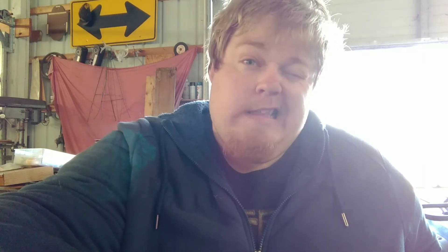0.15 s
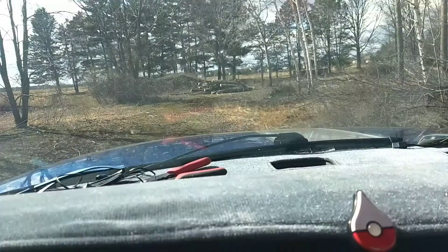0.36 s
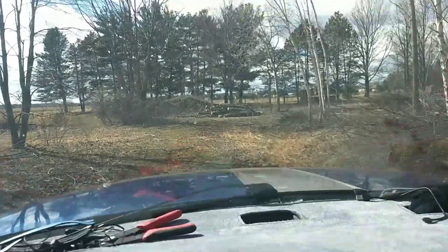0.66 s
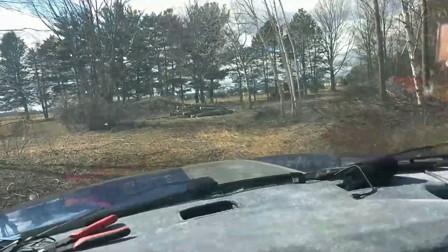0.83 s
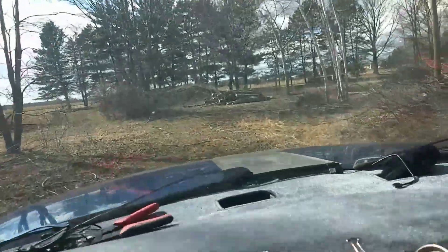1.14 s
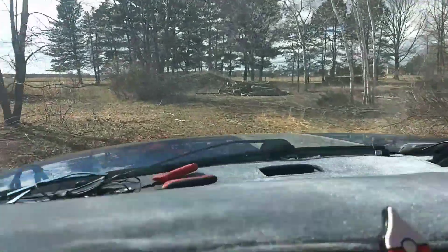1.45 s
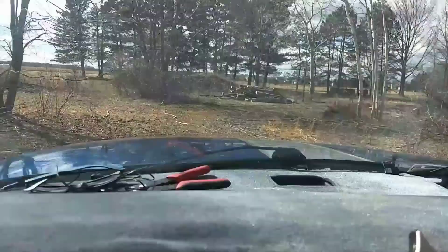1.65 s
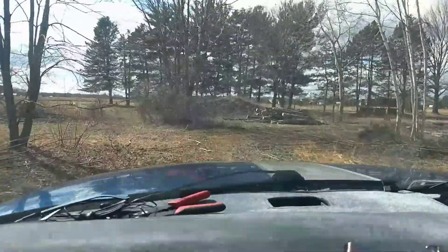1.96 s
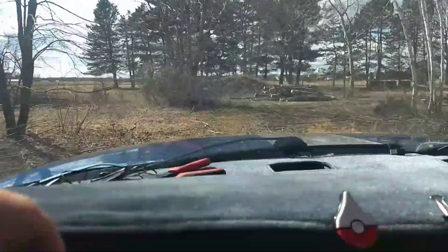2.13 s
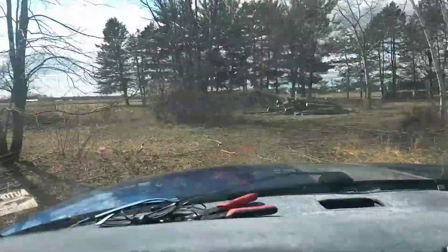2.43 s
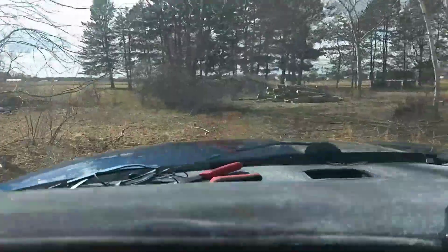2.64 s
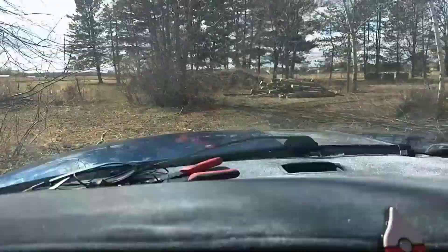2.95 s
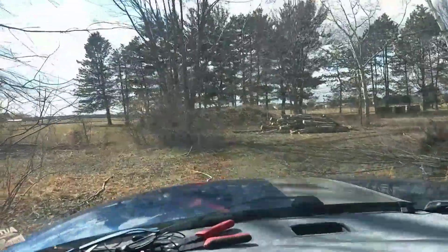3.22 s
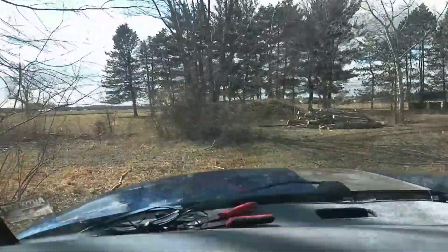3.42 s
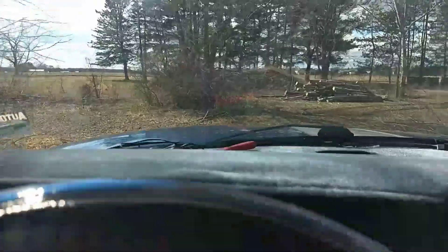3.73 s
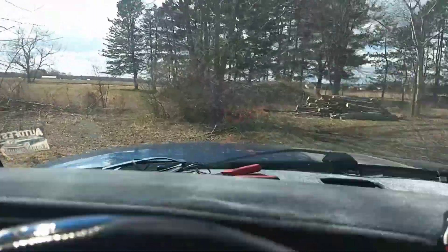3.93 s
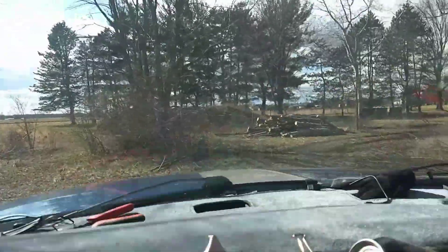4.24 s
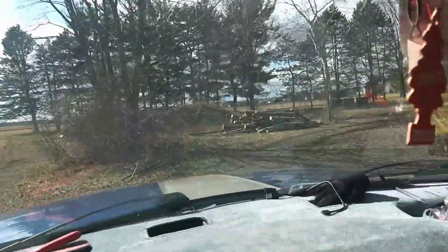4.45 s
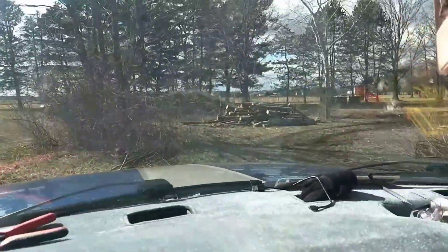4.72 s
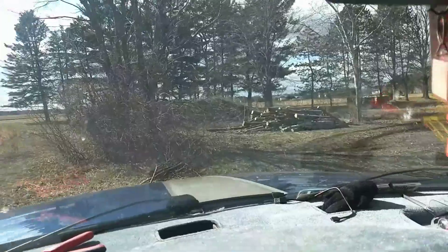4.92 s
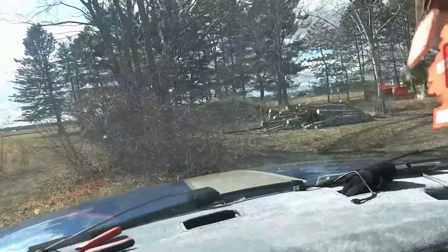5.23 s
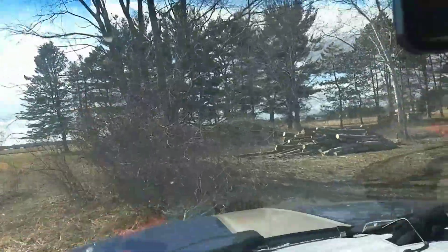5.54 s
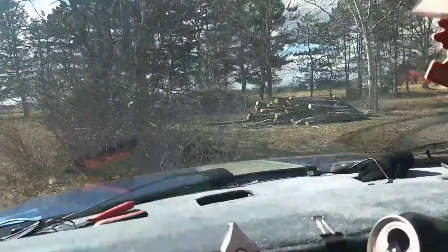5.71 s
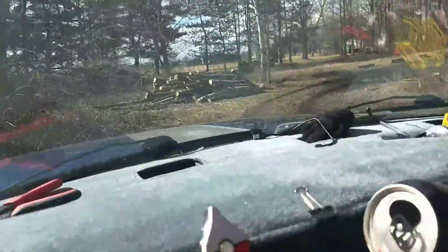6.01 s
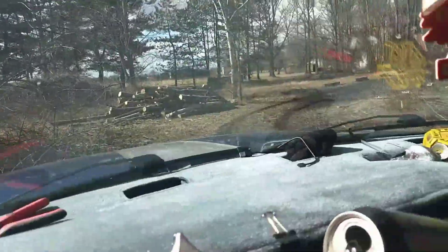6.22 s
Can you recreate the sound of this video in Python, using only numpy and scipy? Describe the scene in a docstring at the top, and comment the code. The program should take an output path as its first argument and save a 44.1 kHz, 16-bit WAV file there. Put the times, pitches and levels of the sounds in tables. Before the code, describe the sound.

After a tap and a click, a pickup engine booms and clatters at low revs, heard from the cab with thuds and dashboard rattles.

```python
"""Pickup on a rough trail

A tap rings out in a quiet workshop and two dry clicks sound close by. Then the scene jumps into the
cab of a crawling pickup. Its six-cylinder engine booms and clatters at low, steady revs, and a
belt-driven pump whines. Bumps thud through the body, loose things knock and rattle on the dashboard,
twigs scrape by and dry litter crackles under the tyres."""
import sys
import numpy as np
from scipy import signal
from scipy.fft import rfft, irfft
from scipy.io import wavfile

SR = 44100
rng = np.random.default_rng(int(sys.argv[2]) if len(sys.argv) > 2 else 0)


def transcribe(u):
    """Save the signal u as a 16-bit wav file named by the first command-line argument.

    u: samples, shape (n,) or (channels, n), limited to [-1, 1]; the rate is SR.
    q: integer samples, one column per channel.
    """
    v = np.clip(np.atleast_2d(u).T, -1, 1)
    q = np.round(v * 32767).astype(np.int16)
    wavfile.write(sys.argv[1], SR, q)


N = 280917
T = np.arange(N) / SR
FREQS = np.maximum(np.arange(N // 2 + 1) * SR / N, 1)
SHOP_END_S, CAB_START_S = .287, .316

# Levels in the tables are relative: they compare one row with another.
# how often the engine fires: time_s, firing_hz
REVS = [(0.3, 51.2), (0.8, 51.1), (1.3, 51.5), (1.75, 51.0), (2.5, 51.8), (3.0, 51.0), (3.55, 51.55),
        (4.0, 51.3), (4.45, 51.55), (4.8, 50.4), (5.05, 50.0), (5.45, 50.1), (5.75, 51.1), (6.02, 50.4),
        (6.37, 51.2)]
# how hard the truck pulls: time_s, effort_db
EFFORT = [(0.7, -0.5), (1.55, -0.5), (2.05, 0), (2.5, -1.5), (2.7, -3.5), (3.05, -2), (3.35, 0.5),
          (3.6, 0.5), (4.05, -0.6), (4.4, 0.85), (4.95, -1.5), (5.3, 0), (5.55, 0.5), (5.9, -0.5),
          (6.37, 0)]
# the exhaust's tones: multiple_of_firing_rate, level_db, left_minus_right_db
BOOM_TONES = [(1, -7, 0), (2, -0.5, 4.5), (3, -10, -4), (4, -14, -3), (5, -18, -2), (6, -20, -1),
              (8, -20, 0), (12, -21, 0)]
# how hard each cylinder clatters, in firing order (one has a loose tappet, a valve part): level_db
CYLINDERS_DB = [-4, -6, 0, -4, -4, -12]
# ringing panels around the engine: pitch_hz, width_hz, boost_db
PANELS = [(419, 33, 5.5), (625, 27, 6), (780, 41, -1), (891, 7, 17), (994, 57, 10), (1218, 22, -7),
          (1440, 18, 3)]
# the pump's tones: multiple_of_pitch, level_db, share_of_swell
PUMP_TONES = [(.777, -13, 0.74), (.951, -6, 0.19), (1, 0, 1), (1.262, -12.5, 0.13)]
# how the whine swells with the load on the pump: time_s, swell_db
PUMP_LOAD = [(0.6, -6.5), (1.45, 3), (1.8, -3), (2.1, 1), (2.35, -5), (2.85, 6), (3.15, -5.5), (3.6, 3),
             (4.3, 1.5), (5.0, -15), (5.45, -3), (5.65, -5), (5.95, 3.5), (6.37, -3.5)]
# jolts coming through the suspension: time_s, level_db
BUMPS = [(0.596, -19), (0.814, -14.5), (1.192, -14.5), (1.367, -14), (1.613, -16.5), (2.002, -21),
         (2.183, -12.5), (2.288, -23), (3.674, -18.5), (3.736, -22), (4.197, -19.5), (4.695, -17),
         (4.739, -16.5), (4.793, -17), (5.167, -18), (5.396, -18), (5.742, -16.5), (6.073, -15.5)]
# the notes of the truck's body: pitch_hz, level_db, fade_s (time to fall by 60 dB)
BODY_NOTES = [(137, -13.5, 0.084), (165, 1.5, 0.065), (179, -3, 0.075), (233, -17.5, 0.1)]
# loose things hitting the dashboard: start_s, clack_db, click_db, treble_db, pitch_hz
KNOCKS = [(0.4566, -26.5, -30, -27, 3130), (0.967, -27, -41.5, -39.5, 2950),
          (1.189, -28, -43.5, -39.5, 2930), (1.583, -33.5, -45, -56, 2600), (1.831, -33.5, -55, -47, 2680),
          (2.066, -35, -48, -63, 2600), (2.321, -32.5, -42, -34, 3060), (2.5494, -25, -28, -35.5, 2560),
          (2.912, -28.5, -30.5, -32.5, 3690), (3.3091, -25, -34.5, -35, 3420), (3.916, -31, -51, -49, 2800),
          (3.951, -31, -43, -44, 2780), (4.147, -33, -49, -62, 2730), (4.339, -29, -40.5, -51, 2930),
          (4.555, -27, -41, -54, 2780), (4.8267, -29.5, -40.5, -63, 3730), (5.345, -40, -51, -46, 2760),
          (5.663, -36, -63, -73, 2680), (5.677, -29.5, -60, -60, 2820), (5.848, -35.5, -45, -43, 2950)]
# a typical lighter tick between those knocks: clack_db, click_db, treble_db, pitch_hz
TICK = (-42.5, -61, -55, 2750)
# the notes of plastic and small metal things: pitch_hz, level_db, fade_s
KNOCK_NOTES = [(3723, -8, 0.07), (4940, 6, 0.025), (5280, 4, 0.02), (11000, -4, .07), (11480, -1, 0.07)]
# twigs brushing the body: middle_s, length_s, level_db
TWIGS = [(0.552, 0.22, -39), (0.94, 0.28, -42), (1.572, 0.14, -48), (4.397, 1, -52), (5.43, 0.18, -44)]
# dry litter under the tyres: time_s, level_db
LITTER = [(0.7, -59), (0.9, -53), (1.1, -59.5), (1.35, -62), (1.55, -54), (1.75, -64), (1.9, -51),
          (2.1, -70), (2.4, -58.5), (2.7, -63), (3.2, -64), (3.6, -55), (4.0, -63), (4.5, -57), (4.9, -58),
          (5.7, -55.5), (6.1, -66), (6.37, -58)]
# dry clicks in the workshop: start_s, level_db
CLICKS = [(0.2164, -21), (0.227, -0.5)]

# Each sound's colour, or how strong it is from low to high: pitch_hz, level_db
CLATTER_COLOUR = [(250, -12.5), (500, 0), (700, 3), (880, -2), (1100, 1.5), (1400, 0), (1750, -0.3),
                  (2200, -5), (2900, -8), (3500, -21), (5000, -18.5), (6500, -44), (16000, -62)]  # burning fuel and valves
TAPPET_COLOUR = [(1500, -65), (2300, 5), (2850, 0.5), (3150, -9.5), (3600, -13.5), (5000, -34), (6500, -53)]  # ringing valve gear
KNOCK_COLOURS = [
    [(150, -24), (600, 9.5), (1500, 2.5), (2100, -0.5), (3200, 3.5), (4000, 0.5), (5500, -35)],
    [(3300, -17.5), (4500, 2), (5200, 6), (6100, 0), (8000, -15.5)],
    [(5500, -20.5), (7600, -1), (9000, -4.5), (12000, 3), (15500, 2.5)],
]  # one list each for a knock's clack, click and treble
RUMBLE_COLOUR = [(25, -40), (45, -27), (80, -5), (125, -1.5), (185, 2), (250, -4), (350, -7), (440, -8),
                 (520, -17), (900, -49)]  # rolling over the ground
RATTLE_COLOUR = [(800, -16), (2000, -1), (2850, -1), (3600, -13.5), (4300, -13), (5100, -18), (6200, -36),
                 (8200, -64), (15000, -26)]  # shaking trim
TWIG_COLOUR = [(1800, -25), (2900, 4), (3700, 3), (4400, 5), (5300, -4), (6500, -16), (8000, -14.5),
               (14000, -25)]  # wood sliding on the body
LITTER_COLOUR = [(4000, 1), (6500, 3), (8500, -14), (10500, -3.5), (12500, 4.5), (15500, 5.5)]  # litter being crushed
TAP_COLOUR = [(150, -34), (600, -8), (1500, 1), (3100, 4.5), (4500, -14), (5900, -3), (8000, -22),
              (10000, -33), (13000, -15), (15500, -7.5)]  # the workshop's echo
CLICK_COLOUR = [(60, -37), (130, 4), (170, 7), (230, 0), (400, -4.5), (950, 7), (1900, -2), (3500, -12),
                (5300, -3.5), (8000, -11.5), (12000, -20), (15500, -40.5)]  # a clicking thin shell
AIR_COLOUR = [(30, -17), (150, -7), (700, -17), (1500, -11.5), (2300, -31), (5500, -33), (9000, -46),
              (15500, -37)]  # the workshop's background

# how alike noise is at the microphone's two openings: pitch_hz, likeness (0 to 1)
LIKENESS = [(60, 0.96), (150, 0.5), (430, 0.38), (650, 0.7), (1050, 1), (1350, 0.73), (1600, .65),
            (2200, 1), (3800, 0.75), (5500, 1), (15000, 0.96)]
# how far the left opening lags behind the right: pitch_hz, lag_radians
LEFT_LAG = [(0, 0), (50, .05), (100, 1.1), (154, 1.5), (330, 1.0), (620, .15), (1080, 0), (1300, .45),
            (1550, 1.6), (1850, 2.7), (2200, 3.4), (16500, 14 * np.pi)]


def boom(firing_count, level_db, waver_db=1.2, uneven_radians=.032):
    """The exhaust fills the cab with low tones; the firings are slightly uneven."""
    out = 0
    for multiple, tone_db, pan_db in BOOM_TONES:
        tone = np.sqrt(2) * np.sin(multiple * (2 * np.pi * firing_count + uneven_radians * wander(32)))
        sides_db = np.array([[pan_db], [-pan_db]]) / 2
        out = out + tone * gain(level_db + tone_db + waver_db * wander(4.3) + sides_db)
    return out


def clatter(firing_count, level_db, repeat=.59):
    """Noise from burning fuel and valves swells at each firing and makes the panels ring."""
    panels = 1 + sum(gain(db) / (1 + ((FREQS - hz) / (width / 2)) ** 2) for hz, width, db in PANELS)
    loudness = (1 + .8 * pulses(firing_count, onset=.78, decay=.4)) * surge(30, spread_db=.6)
    # each turn of the camshaft, which works the valves, brings the same run of small hits
    cylinders = len(CYLINDERS_DB)
    samples = int(cylinders * N / firing_count[-1])
    positions = np.arange(samples) * cylinders / samples
    hits = np.array([np.interp(firing_count, positions, pattern, period=cylinders)
                     for pattern in rng.standard_normal((3, samples))])
    return noise(colour(CLATTER_COLOUR) * np.sqrt(panels), loudness, repeat * hits) * gain(level_db)


def tappets(firing_count, level_db):
    """The valve gear ticks brightly, in a limping pattern that repeats every six firings."""
    return noise(colour(TAPPET_COLOUR), pulses(firing_count, onset=.8, decay=.8)) * gain(level_db)


def pulses(firing_count, onset, decay):
    """Each cylinder gives a burst of its own size; onset and decay are shares of one firing."""
    count, progress = np.divmod(firing_count - onset, 1)
    return gain(CYLINDERS_DB)[count.astype(int) % len(CYLINDERS_DB)] * np.exp(-progress / decay)


def pump(firing_hz, pitch_ratio=15.5, level_db=-37, waver_db=3):
    """The pump's whine follows the revs, drifts as the belt slips and swells under load."""
    out, swell_db = 0, over_time(PUMP_LOAD)
    for multiple, tone_db, share in PUMP_TONES:
        pitch_hz = firing_hz * pitch_ratio * multiple * (1 + .01 * wander(30))
        tone = np.sqrt(2) * np.sin(2 * np.pi * np.cumsum(pitch_hz) / SR)
        out = out + tone * gain(level_db + tone_db + share * swell_db + waver_db * wander(20))
    return out


def bumps(rise_s=.0073, boost_db=2):
    """Each jolt pushes softly on the body, which answers with a short, low thud."""
    out, t = np.zeros(N), T[:SR // 5]
    for time_s, db in BUMPS:
        thud = ring(BODY_NOTES, t, detune=.055) * (1 - np.exp(-(t / rise_s) ** 2))
        add(out, time_s - rise_s / 2, gain(db + boost_db) * thud / np.abs(thud).max())
    return out


def knocks(echo_s=.013, ring_db=-9, boost_db=2.5):
    """A loose thing hits hard, then chatters to rest while the cab throws the sound back."""
    out, t = np.zeros((2, N)), T[:SR // 6]
    filters = [impulse(points) for points in KNOCK_COLOURS]
    for start_s, *levels_db, pitch_hz in KNOCKS + random_ticks():
        direct = rng.standard_normal(len(t)) * (np.exp(-t / .002) + .7 * np.exp(-t / .007))
        contact = direct + .39 * rng.standard_normal((2, len(t))) * np.exp(-t / echo_s)
        notes = ring([(pitch_hz, 9, .028)] + KNOCK_NOTES, t, detune=.01)
        ringing = signal.fftconvolve(contact, [notes / np.linalg.norm(notes)])[:, :len(t)]
        knock = contact + gain(ring_db) * ringing
        for shape, db in zip(filters, levels_db):
            part = signal.fftconvolve(knock, [shape])
            add(out, start_s, gain(db + boost_db) * part / np.std(part[:, :SR // 80]))
    return out


def random_ticks(per_s=2.5, spread_db=1.5):
    """Extra rows like those in KNOCKS: light hits of random time, strength and pitch."""
    *levels_db, pitch_hz = TICK
    chance = rng.random((64, 3))
    times = CAB_START_S + np.cumsum(.2 + 1.6 * chance[:, 0]) / per_s
    return [(start_s, *(np.array(levels_db) + spread_db * size), pitch_hz * (1 + .1 * tuning))
            for start_s, (size, tuning) in zip(times, 2 * chance[:, 1:] - 1) if start_s < T[-1]]


def rumble(level_db):
    """Uneven ground makes a low rumble that rises and falls."""
    return noise(colour(RUMBLE_COLOUR), surge(10, spread_db=1.6)) * gain(level_db)


def rattle(level_db):
    """Uneven ground shakes the cab's trim in flurries of tiny hits."""
    shaking = tiny_hits(per_s=300, spread_db=1, decay_s=.0086) * surge(8, spread_db=5.7)
    return noise(colour(RATTLE_COLOUR), shaking) * gain(level_db)


def twigs():
    """Each twig catches and slips in quick little jerks, swelling and fading as it passes."""
    passing = sum(gain(db) * np.exp(-(2 * (T - middle_s) / length_s) ** 2)
                  for middle_s, length_s, db in TWIGS)
    return noise(colour(TWIG_COLOUR), tiny_hits(per_s=1400, spread_db=3.5, decay_s=.0042)) * passing


def litter(boost_db=8):
    """Dry litter crackles as the tyres roll over it."""
    snaps = tiny_hits(per_s=1700, spread_db=3, decay_s=.0035)
    return noise(colour(LITTER_COLOUR), snaps) * gain(over_time(LITTER) + boost_db)


def workshop_tap(time_s=.0028, level_db=-21):
    """A sharp tap echoes between the walls and dies away."""
    strike = np.exp(-np.abs(T - time_s) / .0015)
    echoes = .38 * np.exp(-T / .012) + .06 * np.exp(-T / .095)
    tap = noise(colour(TAP_COLOUR), strike + echoes)
    return tap * gain(level_db) / np.std(tap[:, :SR // 200])


def workshop_clicks():
    """A thin shell clicks close by; its high ripples outrun the low ones and smear each click."""
    clicks, shape = np.zeros(N), impulse(CLICK_COLOUR)
    for start_s, db in CLICKS:
        add(clicks, start_s, gain(db) * shape / np.abs(shape).max())
    smeared = irfft(rfft(clicks) * np.exp(-.3j * np.sqrt(FREQS)), N)
    return smeared * gain([[-2.2], [2.2]])  # a little to the right


def workshop_air(level_db=-53):
    """The quiet room has a faint, steady hush."""
    return noise(colour(AIR_COLOUR)) * gain(level_db)


def noise(strengths, loudness=1, pattern=0):
    """Stereo noise in a closed space: one part reaches both sides, and each side has its own part."""
    alike = np.clip(over_pitch(LIKENESS), 0, 1)
    shared, *own = rfft((rng.standard_normal((3, N)) + pattern) * loudness)
    sides = np.sqrt(alike) * shared + np.sqrt(1 - alike) * np.array(own)
    return normalise(irfft(strengths * sides, N))


def tiny_hits(per_s, spread_db, decay_s):
    """The loudness over time of many small hits of unequal size."""
    chance, size = rng.random(N), np.minimum(rng.exponential(size=N), 4)
    energy = (chance < per_s / SR) * gain(spread_db * size) ** 2
    fading = signal.lfilter([1], [1, -np.exp(-2 / (decay_s * SR))], energy + 1e-18)
    return normalise(np.sqrt(fading))


def ring(notes, t, detune):
    """The fading notes of a struck thing, tuned a little differently at each blow."""
    return sum(gain(db - 60 * t / fade_s)
               * np.sin(2 * np.pi * hz * (1 + detune * rng.standard_normal()) * t)
               for hz, db, fade_s in notes)


def impulse(points, size=2048):
    """One short click with the given colour."""
    freqs = np.maximum(np.arange(size // 2 + 1) * SR / size, 1)
    # folding the cepstrum (the log spectrum, turned back into time) packs the energy at the start
    cepstrum = irfft(np.log(colour(points, freqs)))
    cepstrum[1:size // 2] *= 2
    cepstrum[size // 2 + 1:] = 0
    return irfft(np.exp(rfft(cepstrum)))


def wander(speed_hz):
    """A smooth random drift with a typical size of 1."""
    return normalise(irfft(rfft(rng.standard_normal(N)) * np.exp(-(FREQS / speed_hz) ** 2), N))


def surge(speed_hz, spread_db):
    """A volume that rises and falls by chance."""
    return gain(spread_db * wander(speed_hz))


def colour(points, freqs=FREQS):
    """Turn a colour table into a strength for every pitch."""
    return gain(over_pitch(points, freqs))


def over_pitch(points, freqs=FREQS):
    """Join a table's points from low to high, giving each octave equal room."""
    hz, value = np.transpose(points)
    return np.interp(np.log(freqs), np.log(hz), value)


def over_time(points):
    """Join a table's points to get a value at every sample."""
    return np.interp(T, *np.transpose(points))


def gain(db):
    """Turn decibels into a number to multiply by."""
    return 10 ** (np.asarray(db) / 20)


def normalise(x):
    """Scale a signal to an average power of 1."""
    return x / np.sqrt(np.mean(x ** 2))


def add(track, start_s, sound):
    """Mix a sound into a track at the given time."""
    i = max(int(start_s * SR), 0)
    track[..., i:i + sound.shape[-1]] += sound[..., :N - i]


def scene():
    """The workshop, a moment of silence, then the cab fades in."""
    workshop = workshop_tap() + workshop_clicks() + workshop_air()
    firing_hz, effort_db = over_time(REVS), over_time(EFFORT)
    firing_count = np.cumsum(firing_hz) / SR
    # pulling harder makes the engine, the rumble and the rattle louder
    engine = boom(firing_count, -27 + .93 * effort_db) + clatter(firing_count, -30 + effort_db)
    around = engine + pump(firing_hz) + rumble(-27.5 + .91 * effort_db)
    bright = rattle(-40.5 + 1.4 * effort_db) + litter()
    thuds = bumps()
    bright += tappets(firing_count, -41 + effort_db) + twigs() + knocks()
    cab = around + thuds + bright * gain([[-1.1], [1.1]])  # bright sounds sit a little to the right
    fade_in = np.interp(T, [CAB_START_S, CAB_START_S + .85], [.33, 1], left=0)
    return workshop * (T < SHOP_END_S) + cab * fade_in


def record(dry, ceiling=.8, top_hz=15800):
    """The microphone's left side lags, loud peaks are rounded and the highest treble is cut."""
    lag = np.interp(FREQS, *np.transpose(LEFT_LAG))
    sides = np.array([irfft(rfft(dry[0]) * np.exp(-1j * lag), N), dry[1]])
    rounded = sides / (1 + (sides / ceiling) ** 6) ** (1 / 6)
    return signal.sosfilt(signal.ellip(10, .2, 80, top_hz, fs=SR, output="sos"), rounded)


dry = scene()
out = record(dry)
transcribe(out)
```